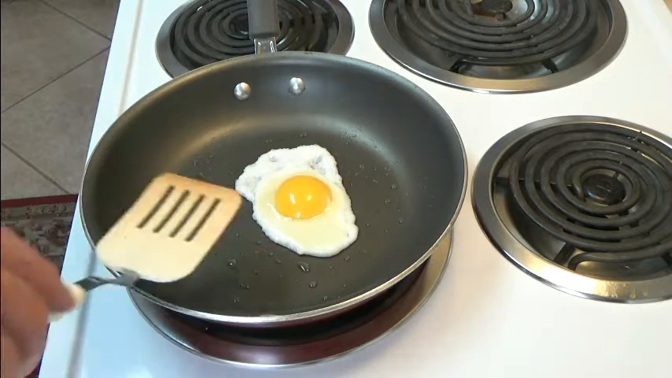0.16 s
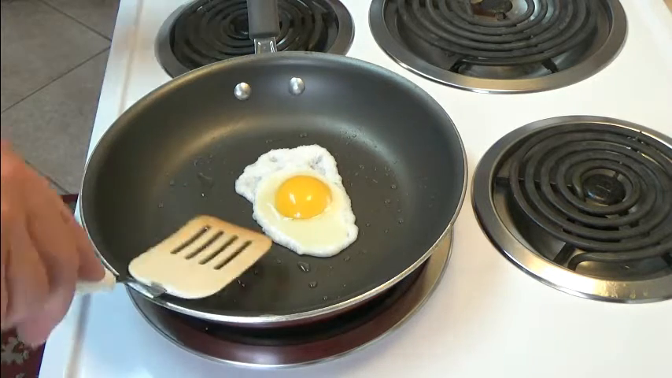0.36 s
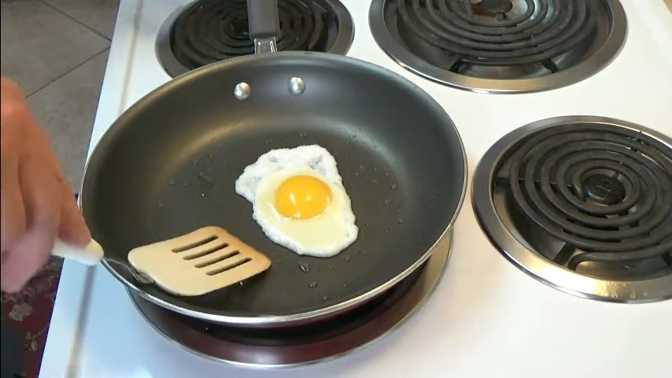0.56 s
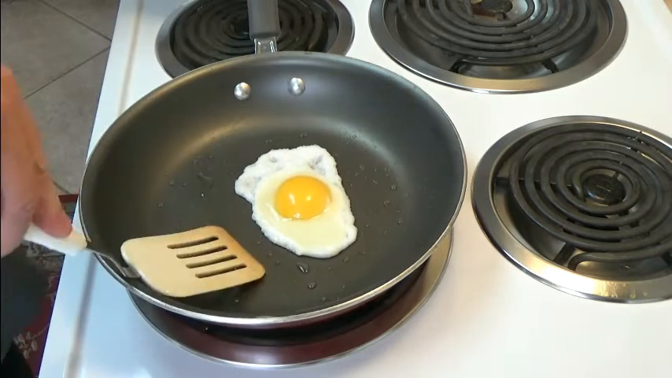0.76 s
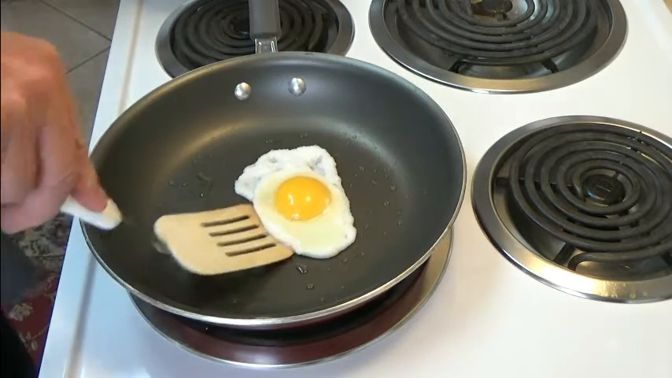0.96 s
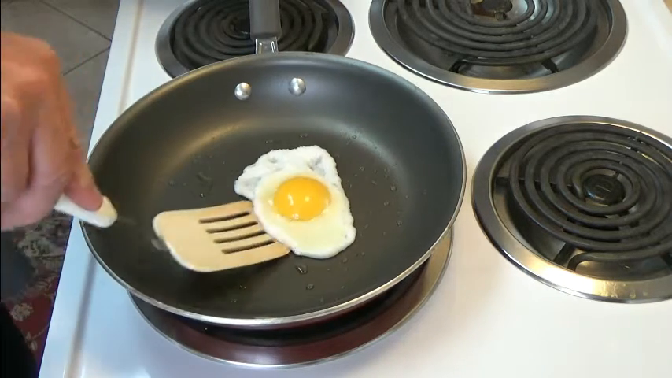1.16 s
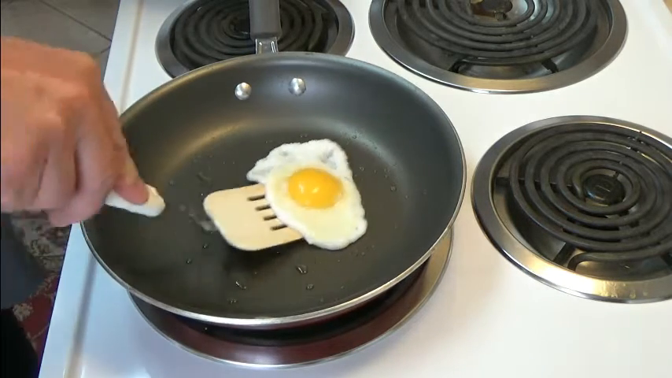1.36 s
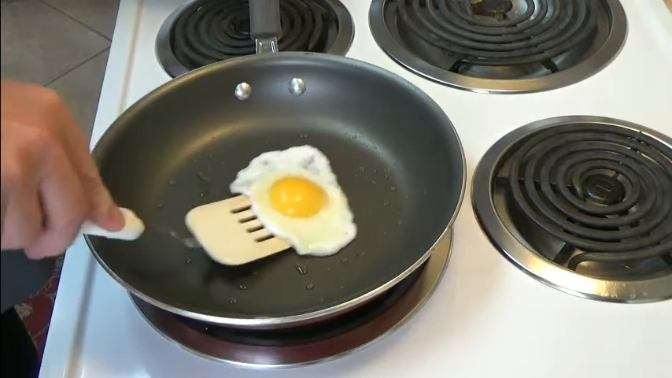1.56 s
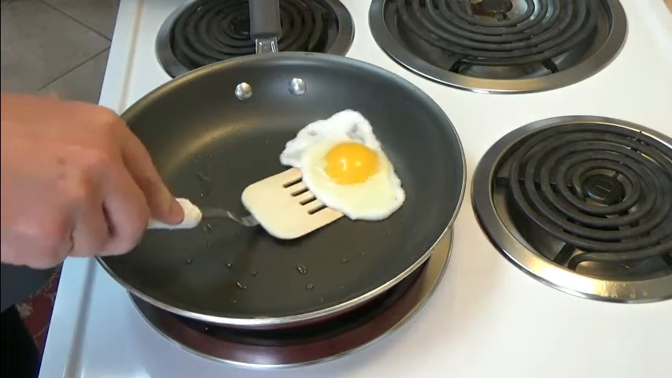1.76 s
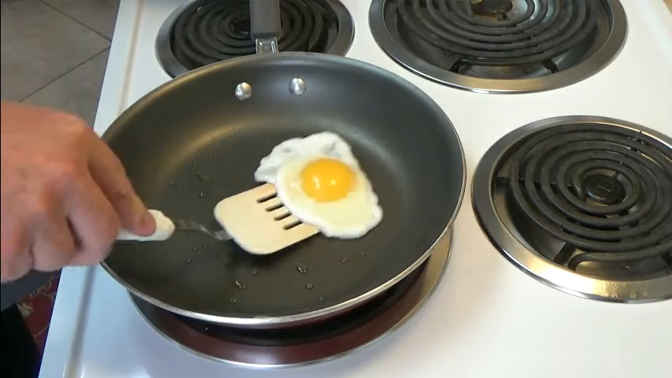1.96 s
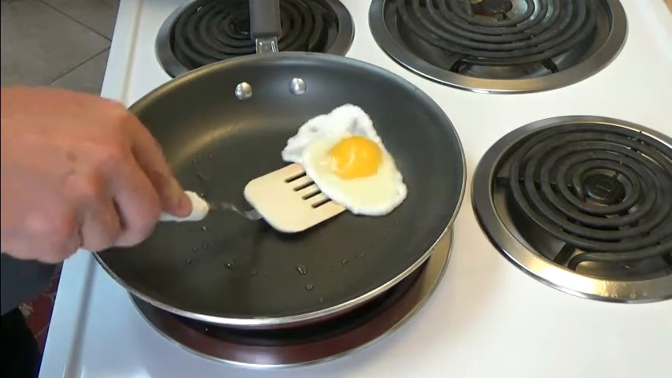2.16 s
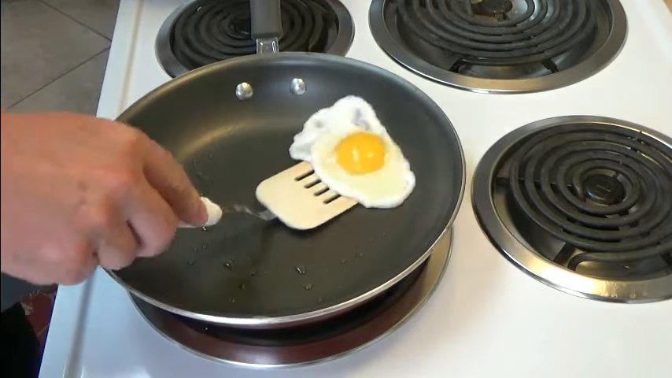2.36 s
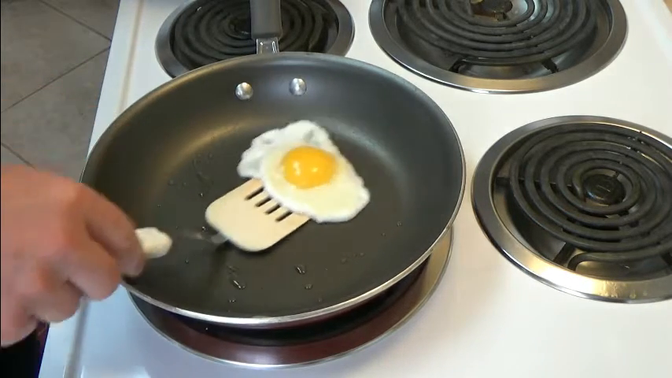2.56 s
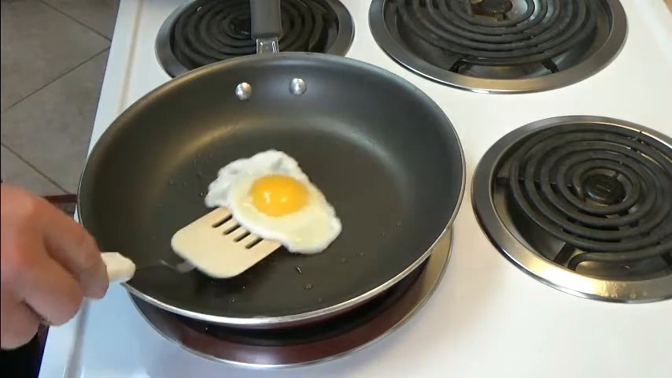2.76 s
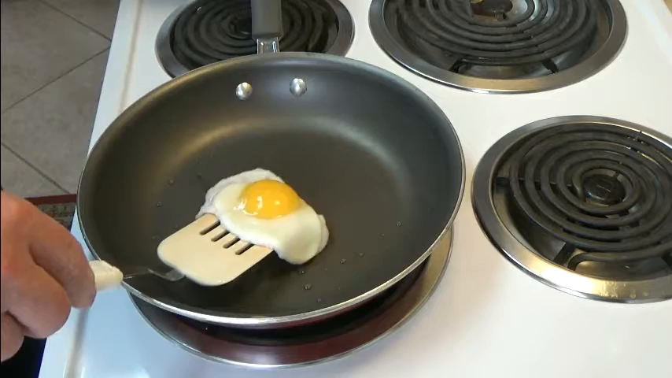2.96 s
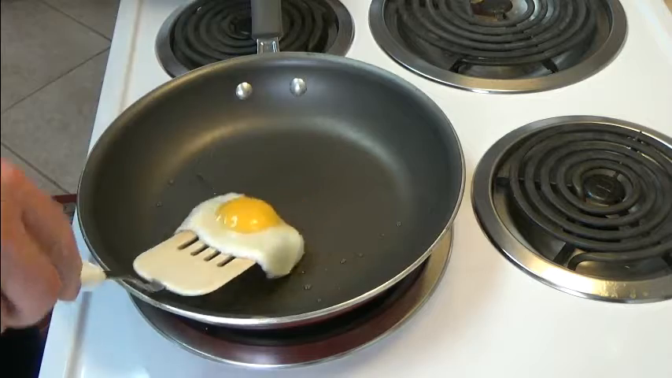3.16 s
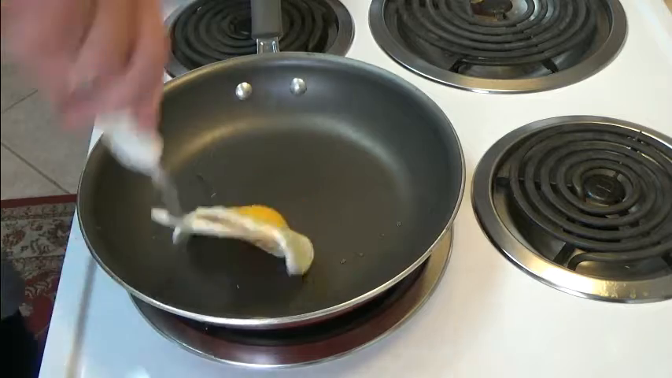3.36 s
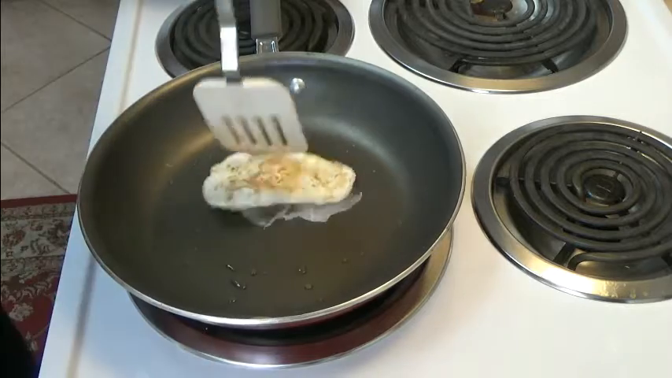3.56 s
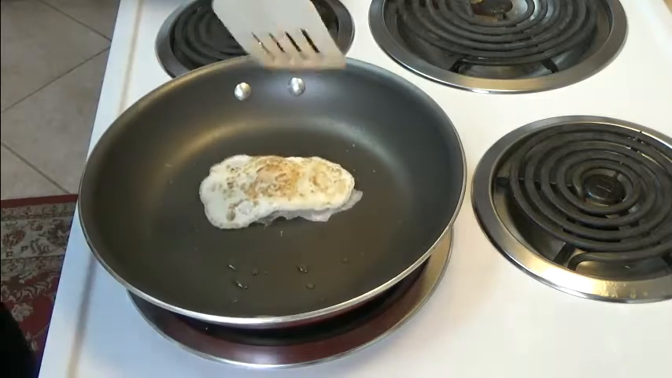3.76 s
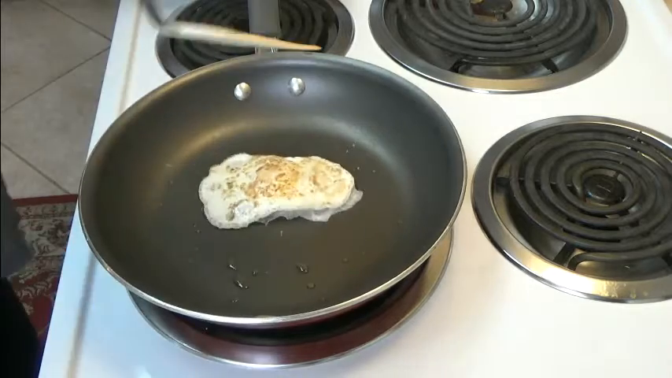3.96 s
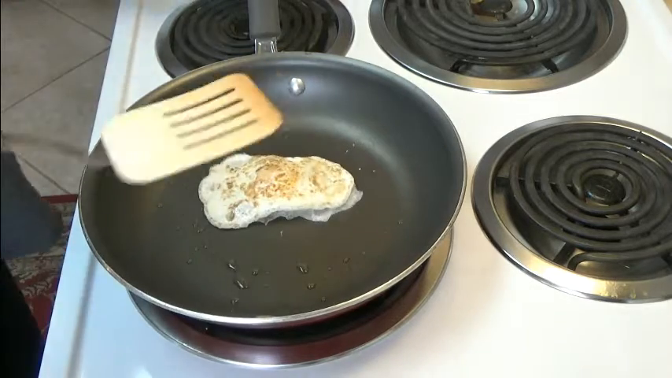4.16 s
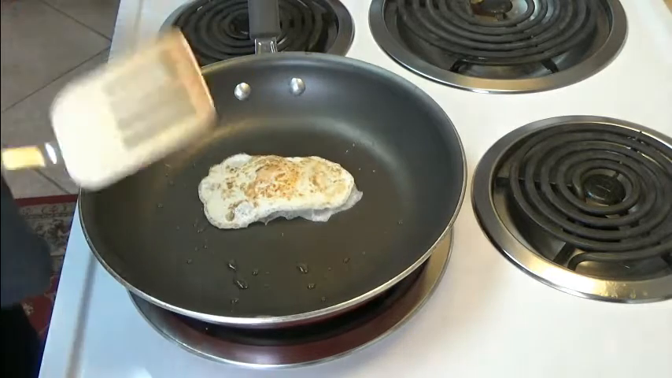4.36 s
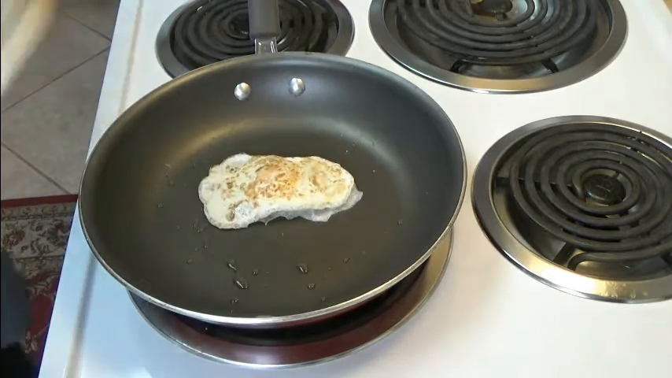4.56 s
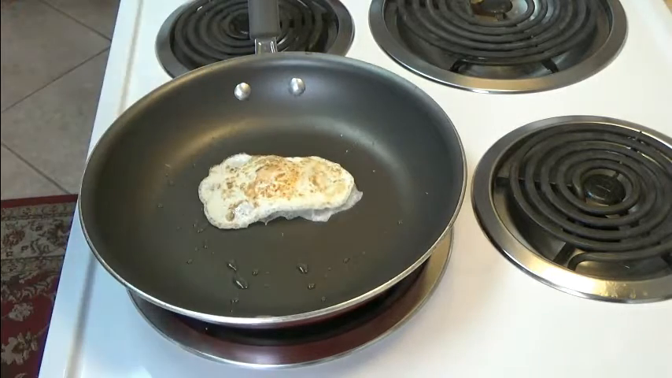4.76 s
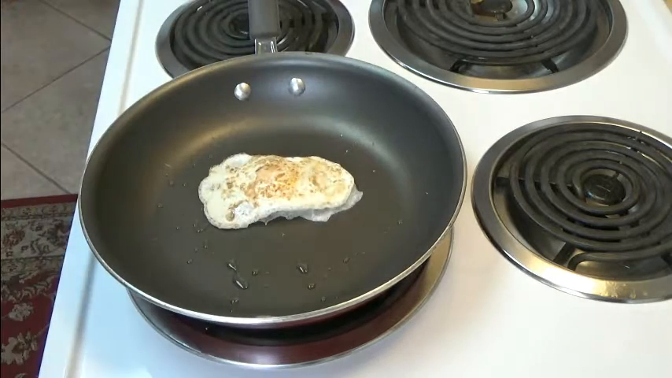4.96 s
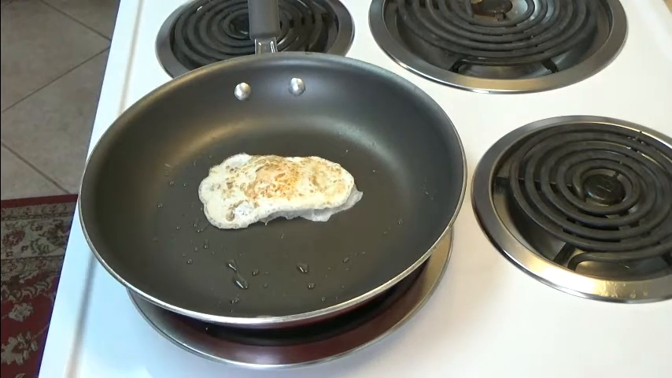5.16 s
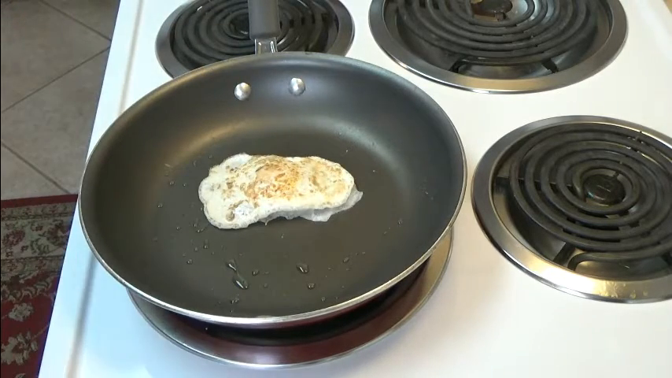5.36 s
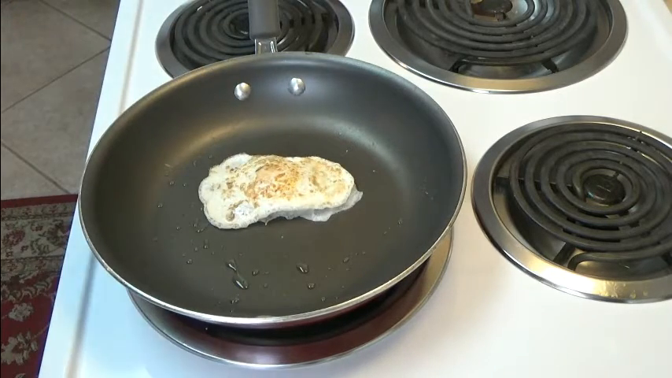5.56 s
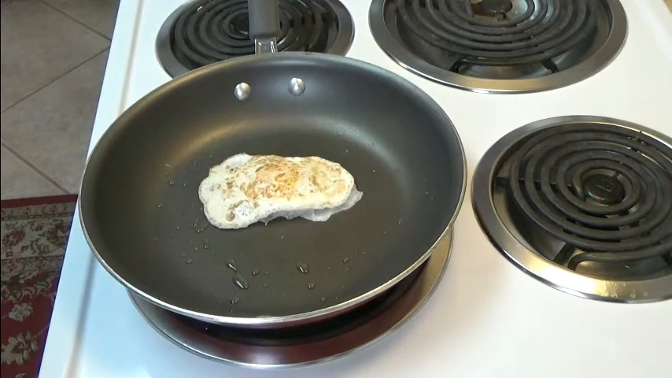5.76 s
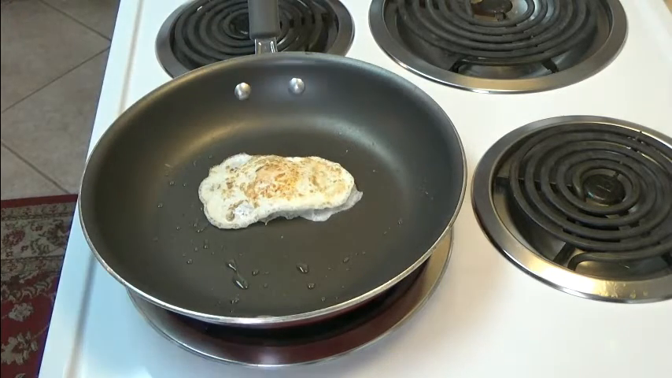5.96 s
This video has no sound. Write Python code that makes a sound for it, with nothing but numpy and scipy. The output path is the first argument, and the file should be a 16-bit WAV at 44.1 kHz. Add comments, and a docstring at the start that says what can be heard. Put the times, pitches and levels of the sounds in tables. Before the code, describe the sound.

A spatula knocks and scrapes in an oily pan among sharp spitting pops, then a flipped egg breaks into a dense, bubbling sizzle.

```python
"""An egg fries in an oiled pan in a quiet kitchen: bursting bubbles sizzle, spiky drops spit in the oil.
First a plastic spatula knocks on the pan (struck modes), slides and catches (drone, rasp), and hisses under the egg.
From 1.9 to 2.9 s it pushes the egg over hot metal, which sets off more and louder drops.
At 3.6 s the egg is turned over: it lands with a soft thud and a dense, bubbling sizzle sets in."""
import sys
import numpy as np
from scipy import signal
from scipy.fft import rfft, irfft, next_fast_len
from scipy.io import wavfile
from scipy.ndimage import map_coordinates

SR = 44100
rng = np.random.default_rng(int(sys.argv[2]) if len(sys.argv) > 2 else 0)


def bounce(signal):
    """Save signal as a 16-bit WAV file at the path given by the first command-line argument."""
    frames = np.transpose(np.atleast_2d(signal))
    limited = np.clip(frames, -1, 1)
    pcm = np.round(limited * 32767).astype(np.int16)
    wavfile.write(sys.argv[1], SR, pcm)


N = 266364  # samples, 6.04 s


def amp(db):
    """Decibels to gain."""
    return 10 ** (np.asarray(db) / 20)


def unit(x):
    """Scale to rms 1."""
    return x / np.sqrt(np.mean(x ** 2) + 1e-20)


def along(points, hz):
    """(Hz, value) points read on a log frequency axis."""
    point_hz, values = np.transpose(points)
    return np.interp(np.log(hz + 1), np.log(point_hz), values)


def curves(rows):
    """One value per sample for each column after the time."""
    times_s, *columns = np.transpose(rows)
    return [np.interp(np.arange(N) / SR, times_s, column) for column in columns]


def wobble(knots_per_s):
    """Smooth random curve: a spline through random knots."""
    knots = rng.standard_normal(int(N * knots_per_s / SR) + 4)
    return map_coordinates(knots, [np.arange(N) * knots_per_s / SR])


def swell(start_s, hold_s, rise_db_per_s, fall_db_per_s):
    """Gain that rises to 1 at start_s, holds and falls, in straight dB slopes."""
    t = np.arange(N) / SR - start_s
    rise_db = rise_db_per_s * t
    fall_db = fall_db_per_s * (hold_s - t)
    return amp(np.minimum(0, np.minimum(rise_db, fall_db)))


def coloured(x, spectrum, size=4096):
    """Minimum-phase filter with the given spectrum, so that clicks keep their sharp fronts."""
    gain = amp(along(spectrum, np.fft.rfftfreq(size, 1 / SR)))
    cepstrum = irfft(np.log(gain))
    # fold the cepstrum onto positive time to make the filter causal
    cepstrum[1:size // 2] *= 2
    cepstrum[size // 2 + 1:] = 0
    impulse_response = irfft(np.exp(rfft(cepstrum)))
    return signal.fftconvolve(x, impulse_response)[:len(x)]


def noise(spectrum):
    """Coloured noise of rms 1."""
    return unit(coloured(rng.standard_normal(N), spectrum))


def add(track, start_s, sound):
    """Mix a sound in at start_s."""
    part = track[max(round(start_s * SR), 0):][:len(sound)]
    part += sound[:len(part)]


def grains(rate_per_s, hz, scatter, cycles, spread_db, size):
    """Tiny random bursts: damped cosines of random pitch and strength, at even power whatever the rate."""
    chance = rng.random(N) * SR / rate_per_s
    at = np.flatnonzero(chance < 1)
    pitch_hz = hz * np.exp(scatter * rng.standard_normal(len(at)))
    pitch = np.minimum(pitch_hz, SR / 2)[:, None] / SR  # cycles per sample
    rarity = np.minimum(-np.log(chance[at]), 4)  # strong bursts are rare
    sign = rng.choice([-1, 1], len(at))
    strength = sign * amp(spread_db * rarity) / np.sqrt(rate_per_s[at])
    turns = pitch * np.arange(size)
    waves = np.cos(2 * np.pi * turns) * np.exp(-turns / cycles)
    waves *= strength[:, None] * np.sqrt(pitch)
    places = at[:, None] + np.arange(size)
    return np.bincount(places.ravel(), waves.ravel(), N + size)[:N]


# Spectrum of the quiet kitchen. Each row: frequency in Hz, level in dB.
KITCHEN_SPECTRUM = [(24, -45), (40, 4), (125, 0), (355, -2), (432, -18), (845, -4.5), (4560, -10),
                    (8910, -8), (15000, -10.5)]
# Spectrum of moving air. Each row: frequency in Hz, level in dB.
AIR_SPECTRUM = [(10, 3), (24, -6), (32, 3), (42, -7), (55, -3), (120, -19), (400, -66)]
# Puffs of air at the microphone. Each row: start in seconds, hold in seconds, level in dB.
AIR_PUFFS = [(0.117, .03, -56), (.29, .04, -64), (.55, .02, -46.5), (5.52, 0.13, -52.5)]
PUFF_RISE_DB_PER_S, PUFF_FALL_DB_PER_S, STILL_AIR_DB = 250, 140, -73


def background():
    """Steady kitchen noise, and low air noise that swells in puffs."""
    puffs = np.zeros(N)
    for start_s, hold_s, db in AIR_PUFFS:
        puffs += amp(db) * swell(start_s, hold_s, PUFF_RISE_DB_PER_S, PUFF_FALL_DB_PER_S)
    air = np.hypot(puffs, amp(STILL_AIR_DB)) * noise(AIR_SPECTRUM)
    return amp(-52) * noise(KITCHEN_SPECTRUM) + air


# Width of the reflections. Each row: frequency in Hz, side against mid in dB.
REFLECTION_WIDTH = [(60, -14), (200, -8), (700, -7.5), (1400, -11.5), (2800, -11), (6000, -12.5),
                    (10000, -13.5), (13000, -25)]


def echo(x, near_db, near_t60_s, room_db, room_t60_s, pieces=90):
    """Pan wall and hob answer in milliseconds, the kitchen later; each 67 ms piece gets a new random pattern."""
    wet, t = np.zeros((2, N)), np.arange(SR // 3) / SR
    near = amp(-60 * t / near_t60_s)
    room = amp(-60 * t / room_t60_s)
    near *= amp(near_db) / np.linalg.norm(near)
    room *= amp(room_db) / np.linalg.norm(room)
    decay = np.hypot(near, room)
    for piece in np.array_split(np.arange(N), pieces):
        for channel in wet:
            reflections = decay * rng.standard_normal(len(t))
            add(channel, piece[0] / SR + 0.002, signal.fftconvolve(x[piece], reflections))
    mid, side = wet[0], coloured(wet[1], REFLECTION_WIDTH)
    return np.array([mid + side, mid - side])


# Spatula striking the pan. Each row: start in seconds, relative level in dB.
SPATULA_KNOCKS = [(0.19, -49), (0.65, -12.5), (0.659, -37), (.782, -28), (1.115, -36.5)]
# Modes of spatula and pan. Each row: frequency in Hz, mean relative level in dB, T60 in seconds.
RING_MODES = [(986, -14.5, 0.16), (1765, -12, 0.13), (2025, -16, 0.24), (2660, -3, 0.056),
              (3720, -18, 0.18), (4820, -2, 0.052), (5870, -3, 0.078), (5790, 6, 0.027), (6150, -15, .12),
              (8400, -7, 0.12), (7600, -19, 0.14)]


def knocks():
    """A hard knock rings the modes of spatula and pan, under a noisy clack."""
    track, t = np.zeros(N), np.arange(SR // 2) / SR
    clack_spectrum = [(200, -31), (900, 0.5), (3000, 5), (4000, 3.0), (6000, 2), (9000, -4), (13000, -24)]
    for start_s, db in SPATULA_KNOCKS:
        ring = np.zeros(len(t))
        for hz, mode_db, t60_s in RING_MODES:
            decay = amp(mode_db + rng.normal(0, 0.88) - 60 * t / t60_s)
            ring += decay * np.sin(2 * np.pi * (hz * t + rng.random()))
        clack = noise(clack_spectrum)[:len(t)] * amp(2.0 - 60 * t / 0.097)
        attack = 1 - np.exp(-t / 0.00081)
        add(track, start_s, amp(db - 8.5) * (ring + clack) * attack)
    return track


# Spectrum of the pan's drone and thuds. Each row: frequency in Hz, level in dB.
DRONE_SPECTRUM = [(60, -7), (150, -1.5), (250, -3.5), (335, 4), (430, -4.5), (600, -4.5), (1200, -16),
                  (3000, -80)]
# Soft bumps of spatula and landing egg. Each row: start in seconds, level in dB, T60 in seconds.
SOFT_BUMPS = [(.464, -42, 0.22), (.654, -38, 0.24), (1.351, -38.5, 0.22), (3.612, -45, .3)]


def bumps():
    """A soft contact only thuds: low noise with a slow attack."""
    track, t = np.zeros(N), np.arange(SR // 2) / SR
    for start_s, db, t60_s in SOFT_BUMPS:
        thud = noise(DRONE_SPECTRUM)[:len(t)] * amp(db - 60 * t / t60_s)
        add(track, start_s, thud * (1 - np.exp(-t / 0.01)))
    return track


# Spatula sliding on the pan. Each row: time in seconds, drone level in dB before contact fades.
SLIDE_LEVEL = [(0, -58.5), (.5, -67.5), (.66, -52.5), (.84, -49), (1.17, -63.5), (1.9, -62)]
# Blade's edge catching on the pan. Each row: start in seconds, rasp level in dB.
EDGE_CATCHES = [(0.01, -42.5), (.265, -56.5), (.67, -54), (.935, -42.5)]
# Spectrum of the rasp. Each row: frequency in Hz, level in dB.
RASP_SPECTRUM = [(300, -19), (600, 2), (720, -7.5), (840, 6.5), (1050, -6.5), (1450, 3), (1800, 1.5),
                 (2400, -3), (5000, -44)]
CATCH_RISE_DB_PER_S, CATCH_FALL_DB_PER_S = 299.5, 203


def sliding():
    """Sliding makes the pan drone and the blade rasp in many tiny slips; catches swell the rasp."""
    drone_db, = curves(SLIDE_LEVEL)
    contact = np.interp(np.arange(N) / SR, [1.8, 2.1], [1, 0])
    catches = np.zeros(N)
    for start_s, db in EDGE_CATCHES:
        catches += amp(db) * swell(start_s, 0, CATCH_RISE_DB_PER_S, CATCH_FALL_DB_PER_S)
    slips = grains(np.full(N, 700), hz=1220, scatter=0.58, cycles=2.1, spread_db=1.0, size=256)
    rasp = unit(coloured(slips, RASP_SPECTRUM)) * np.hypot(catches, amp(drone_db))
    drone = noise(DRONE_SPECTRUM) * amp(drone_db)
    return contact * (drone + rasp)


# Strokes of the blade in under the egg. Each row: start in seconds, hold in seconds, mean hiss level in dB.
SHOVE_STROKES = [(1.38, 0.088, -37), (1.581, 0.034, -41), (1.72, 0.14, -36.5)]
# Spectrum of the hiss. Each row: frequency in Hz, level in dB.
SCRAPE_SPECTRUM = [(500, -18.5), (1400, -5), (2200, -1.5), (3500, -1.5), (6000, 1), (9200, 1.5),
                   (12000, -5.5), (16000, -21)]
SHOVE_RISE_DB_PER_S, SHOVE_FALL_DB_PER_S = 650, 333


def shove():
    """The blade hisses over oily metal as it lifts the egg: unsteady noise in three strokes."""
    strokes = np.zeros(N)
    for start_s, hold_s, db in SHOVE_STROKES:
        strokes += amp(db) * swell(start_s, hold_s, SHOVE_RISE_DB_PER_S, SHOVE_FALL_DB_PER_S)
    return noise(SCRAPE_SPECTRUM) * strokes * amp(2.7 * wobble(83))


# Larger steam pockets. Each row: start in seconds, level in dB, starting pitch in Hz, T60 in seconds.
STEAM_POCKETS = [(.943, -23, 1530, 0.018), (2.0145, -23, 2120, .015), (3.137, -12.5, 3380, 0.0078),
                 (3.5168, -17, 2800, .0056), (3.659, -16, 4800, .014), (3.6609, -13, 1740, 0.051),
                 (3.665, -18, 1600, 0.056), (3.786, -16, 4770, .018), (4.048, -12.5, 1540, 0.0057),
                 (4.2, -13, 1790, 0.012), (4.247, -17, 1460, 0.019), (4.254, -16, 1700, .0092),
                 (5.193, -12.5, 2010, 0.0057), (5.63, -10, 2400, 0.0038), (5.719, -11, 2530, 0.0067)]


def pockets():
    """A steam pocket snaps open and rings briefly, its pitch rising a little."""
    track, t = np.zeros(N), np.arange(SR // 10) / SR
    for start_s, db, hz, t60_s in STEAM_POCKETS:
        tone = np.sin(2 * np.pi * hz * t * (1 + 1.2 * t))
        tone *= amp(-60 * t / t60_s) * (1 - np.exp(-t / 0.0001))
        snap_spectrum = [(hz / 10, -36), (hz / 3, -20), (hz, 0), (2 * hz, -6), (6 * hz, -24)]
        snap = unit(coloured(rng.standard_normal(len(t)), snap_spectrum)) * amp(-5.5 - 60 * t / 0.014)
        add(track, start_s, amp(db) * (tone + snap))
    return track


# Spectrum of spitting oil. Each row: frequency in Hz, level in dB.
SPIT_SPECTRUM = [(150, -21.5), (700, -19), (1200, -19.5), (2000, -4), (3200, -3), (4300, -3.5), (6300, 2),
                 (8000, 0.5), (9200, 5), (12000, -0.5), (14000, -6.5), (16000, -9.5), (20000, -12.5)]
# Fat drops that pop and spray. Each row: start in seconds, mist level in dB, T60 in seconds.
FAT_DROPS = [(1.1168, -19, 0.011), (2.007, -13, 0.0035), (2.146, -16, .005), (2.605, -16, 0.0034),
             (2.8507, -12, .012), (3.138, -10.5, 0.0049), (3.1581, -13, 0.012), (3.25, -9.5, 0.0082),
             (3.288, -21, 0.037), (3.4975, -12, 0.0057), (4.81, -12.5, 0.032), (4.917, -13.5, .05),
             (5.06, -23, 0.0084), (5.403, -11.5, .02), (5.718, -15, 0.0051)]


def sprays():
    """A fat drop tears apart in a short decaying burst of mist noise."""
    track, t = np.zeros(N), np.arange(SR // 20) / SR
    for start_s, db, t60_s in FAT_DROPS:
        mist = unit(coloured(rng.standard_normal(len(t)), SPIT_SPECTRUM))
        add(track, start_s, mist * amp(db - 60 * t / t60_s))
    return track


def spikes(drops, spectrum, size=512):
    """Each drop bursts in one sharp spike; the torn oil film rings for a cycle or two."""
    track, t = np.zeros(N), np.arange(size) / SR
    for start_s, peak_db in drops:
        pitch, film = rng.standard_normal(2)
        film_hz = 8000 * np.exp(0.35 * pitch)
        burst = 0.35 * film * np.sin(2 * np.pi * film_hz * t) * np.exp(-t / 0.00018)
        burst[0] += 1
        burst = coloured(burst, spectrum)
        add(track, start_s, amp(peak_db) * burst / np.abs(burst).max())
    return track


DROPS_PER_S, DROP_RATE_POWER = 30, 0.45  # rate at full steam, and how it follows the flow
DROP_DB, DROP_DB_PER_STEAM_DB, DROP_SCATTER_DB = -5.5, 0.5, 1.7
PUSH_START_S, PUSH_END_S, PUSH_EXTRA_DROPS_PER_S, PUSH_LOUDER_DB = 1.88, 2.9, 12, 3


def lesser_drops(candidates=360):
    """Random (s, peak dB) bursts: more steam, or pushing the egg over hot oil, makes more and louder drops."""
    fizz_db, _ = curves(STEAM_FLOW)
    place, luck = rng.random((2, candidates))
    start_s = place * N / SR
    steam_db = fizz_db[(place * N).astype(int)] - fizz_db.max()
    pushed = (start_s > PUSH_START_S) & (start_s < PUSH_END_S)
    rate_per_s = DROPS_PER_S * amp(steam_db) ** DROP_RATE_POWER + PUSH_EXTRA_DROPS_PER_S * pushed
    peak_db = DROP_DB + DROP_DB_PER_STEAM_DB * steam_db + PUSH_LOUDER_DB * pushed
    peak_db += DROP_SCATTER_DB * rng.standard_normal(candidates)
    bursts = luck < rate_per_s * N / SR / candidates
    return list(zip(start_s[bursts], peak_db[bursts]))


# Water drops bursting in the oil. Each row: start in seconds, relative peak in dB.
PLACED_DROPS = [(0.1213, -12), (0.4653, -13), (0.5213, -11), (0.711, -6.5), (0.7658, -12), (0.7811, -3),
                (0.8549, -11), (0.8684, -12), (0.9157, -9), (0.9614, -10.5), (1.074, -15), (1.1468, -9),
                (1.2181, -13), (1.2512, -9.5), (1.3268, -11), (1.491, -15.5), (1.5817, -9.5),
                (1.8886, -8.5), (1.9564, -10.5), (1.9895, -8), (2.0325, -2), (2.0702, -8), (2.0985, -3.5),
                (2.2147, -1), (2.2435, -2), (2.2698, -9), (2.388, -8.5), (2.4263, 0), (2.4773, -8),
                (2.4948, -3.5), (2.7067, -7), (2.7646, -3.5), (2.9379, -6.5), (3.034, -9), (3.3225, -2.5),
                (3.3358, -5.5), (3.4213, -9), (3.461, -7.5), (3.5175, -6), (3.646, -19)]
# Change of colour for a drop with less body than a fat one. Each row: frequency in Hz, gain in dB.
SMALL_DROP_TILT = [(1500, -4), (4000, -4.5), (9000, 1.5), (13000, 2.5)]
FAT_POP_PEAK_DB = -2.5


def pops():
    """Small drops snap brightly; fat ones, which start each spray, have more body."""
    fat_drops = [(start_s, FAT_POP_PEAK_DB) for start_s, _, _ in FAT_DROPS]
    small_spectrum = [(hz, db + along(SMALL_DROP_TILT, hz)) for hz, db in SPIT_SPECTRUM]
    fat = spikes(fat_drops, SPIT_SPECTRUM)
    placed = amp(0.5) * spikes(PLACED_DROPS, small_spectrum)
    return fat + placed + spikes(lesser_drops(), small_spectrum)


# Steam escaping from under the egg. Each row: time in seconds, relative fizz in dB, relative bubbling in dB.
STEAM_FLOW = [(0, -51.5, -53.5), (0.52, -51.5, -61.5), (0.72, -33.5, -39.5), (1.02, -46.5, -57),
              (1.16, -37.5, -52), (1.67, -45.5, -65), (2.02, -29.5, -42), (2.34, -37, -46),
              (2.6, -29.5, -40.5), (2.87, -29, -46.5), (2.98, -35.5, -46), (3.31, -33.5, -46.5),
              (3.43, -40.5, -49), (3.73, -21, -37), (4.55, -21, -31.5), (4.9, -22.5, -34.5),
              (5.0, -23.5, -36), (6.04, -24, -34.5)]
# Spectrum of the fizz. Each row: frequency in Hz, level in dB.
FIZZ_SPECTRUM = [(1470, -29), (2500, -6), (2740, -8.5), (3560, -6.5), (5710, -1.5), (6510, 0), (7360, -2),
                 (9070, 1), (11600, -3.5), (13200, -7), (15100, -16), (15800, -6.5)]
# Spectrum of the bubbling. Each row: frequency in Hz, level in dB.
BUBBLING_SPECTRUM = [(100, -26.5), (300, -18.5), (500, -8), (900, -9), (1450, -3.5), (1800, -3),
                     (2600, -1.5), (3600, -3), (6000, -11.5), (12000, -50)]


def sizzle():
    """More steam makes more bubbles: dry fizz, tiny ringing beads, and lower spluttering under the egg."""
    fizz_db, bubbling_db = curves(STEAM_FLOW)
    flow = amp(fizz_db - fizz_db.max())
    clusters = wobble(70) + 0.45 * wobble(220)  # bubbles burst in flurries
    dry_grains = grains(1800 + 2200 * flow, hz=9650, scatter=0.65, cycles=0.35, spread_db=6.0, size=48)
    bead_grains = grains(500 + 700 * flow, hz=8580, scatter=0.393, cycles=3.5, spread_db=5.0, size=128)
    beads = amp(-2.5) * np.sqrt(flow) * unit(coloured(bead_grains, FIZZ_SPECTRUM))
    fine = unit(coloured(dry_grains, FIZZ_SPECTRUM)) + beads
    fizz = fine * amp(fizz_db - 2.5 + 1.72 * clusters)
    coarse = grains(700 + 1100 * flow, hz=1835, scatter=0.6, cycles=0.5, spread_db=2.5, size=256)
    splutter_db = bubbling_db - 2.0 + 2.12 * clusters + 1.45 * wobble(21.8)
    bubbling = unit(coloured(coarse, BUBBLING_SPECTRUM)) * amp(splutter_db)
    return fizz + bubbling


def scene():
    """The pan sounds straight ahead over the background; only its reflections have width."""
    spatula = knocks() + bumps() + sliding() + shove()
    pan = spatula + pockets() + sprays() + pops() + sizzle()
    reflections = echo(pan, near_db=-6.5, near_t60_s=0.11, room_db=-12.5, room_t60_s=0.41)
    return pan + reflections + background()


TOP_HZ, CEILING = 15900, 0.66


def record(dry):
    """Tall spikes are rounded off below a ceiling, then nothing passes above the band limit."""
    rounded = dry / (1 + (dry / CEILING) ** 6) ** (1 / 6)
    size = next_fast_len(N + SR // 2)
    passband = np.fft.rfftfreq(size, 1 / SR) < TOP_HZ
    return irfft(rfft(rounded, size) * passband, size)[:, :N]


dry = scene()
out = record(dry)
bounce(out)
```